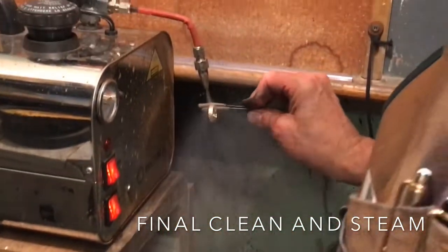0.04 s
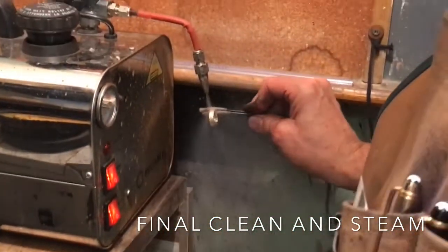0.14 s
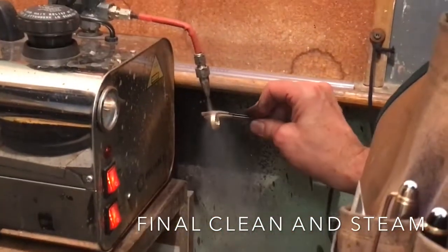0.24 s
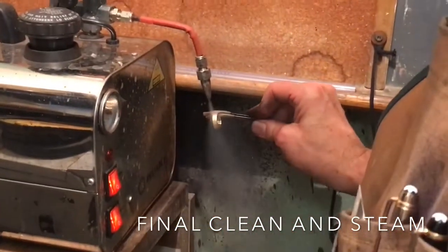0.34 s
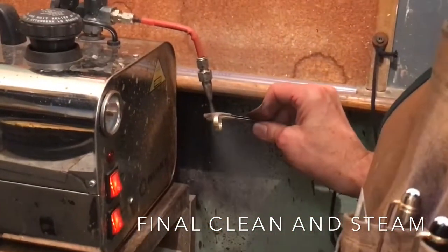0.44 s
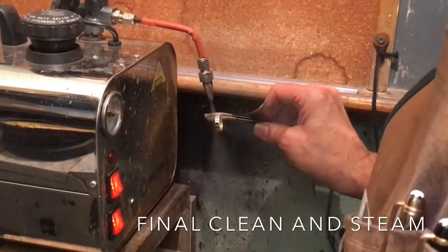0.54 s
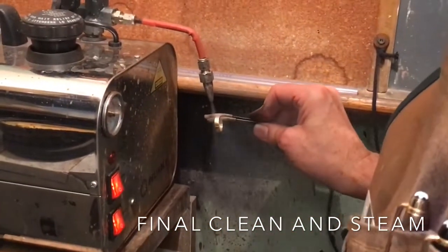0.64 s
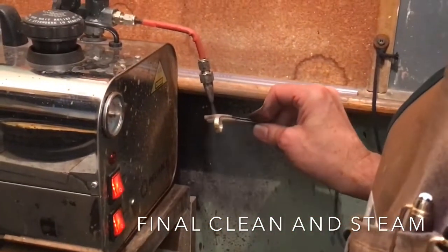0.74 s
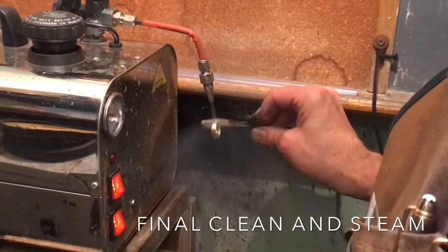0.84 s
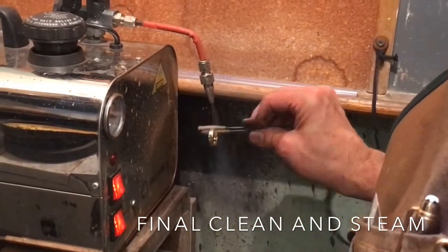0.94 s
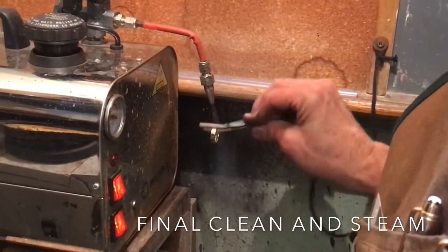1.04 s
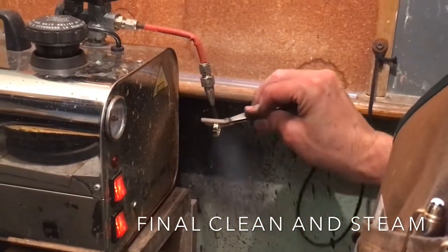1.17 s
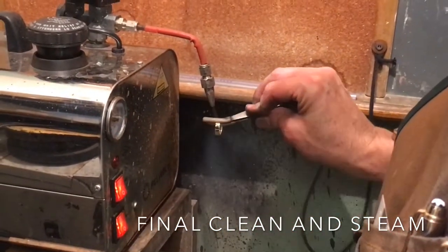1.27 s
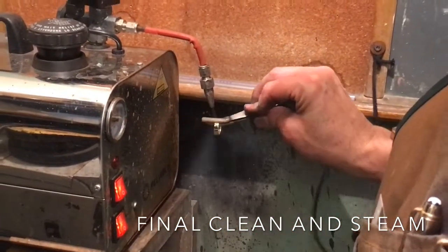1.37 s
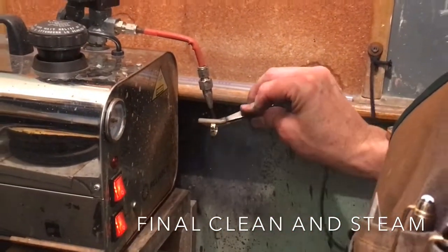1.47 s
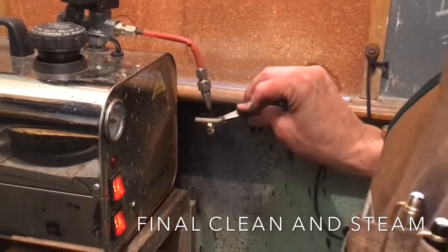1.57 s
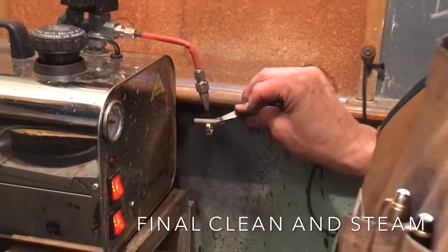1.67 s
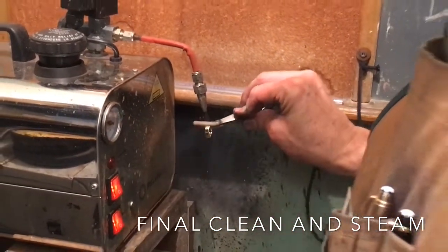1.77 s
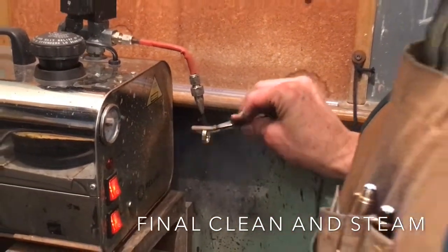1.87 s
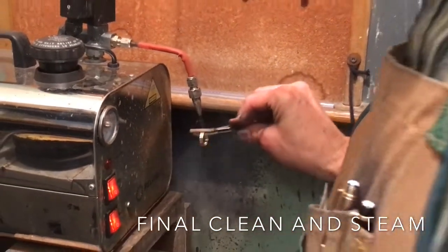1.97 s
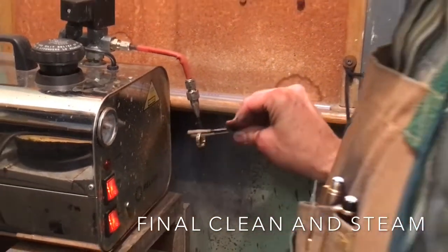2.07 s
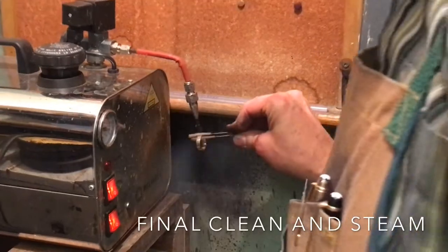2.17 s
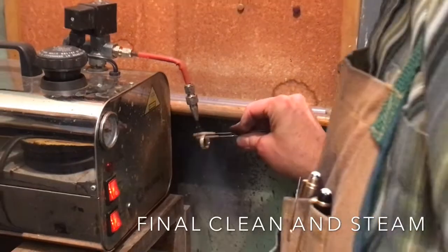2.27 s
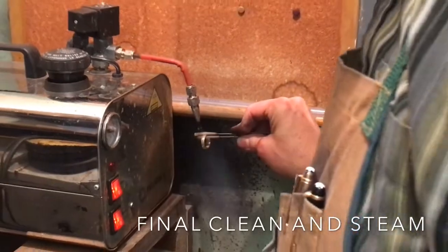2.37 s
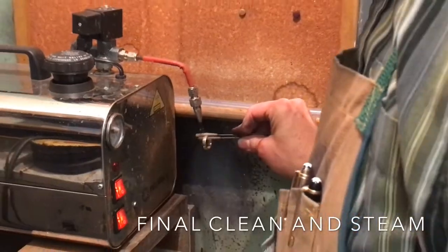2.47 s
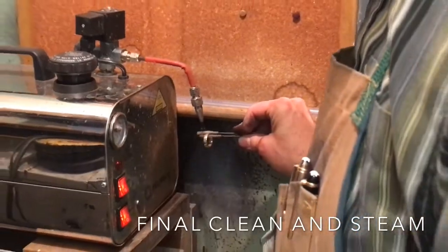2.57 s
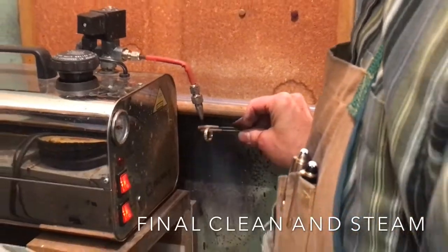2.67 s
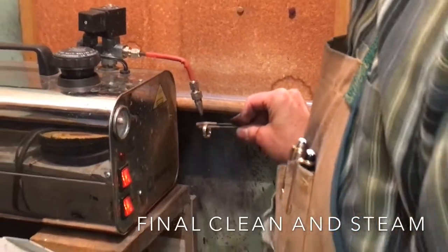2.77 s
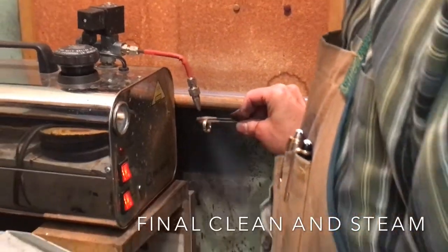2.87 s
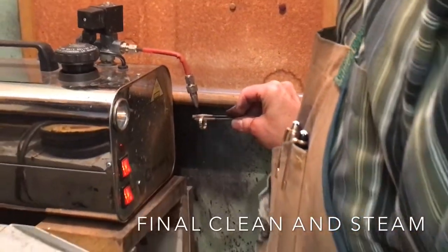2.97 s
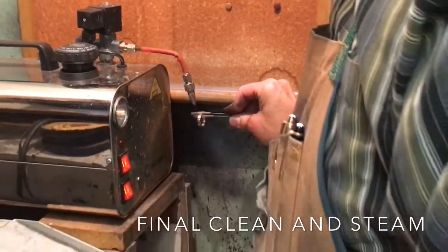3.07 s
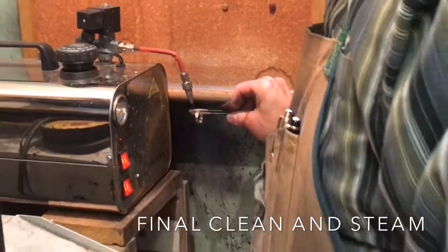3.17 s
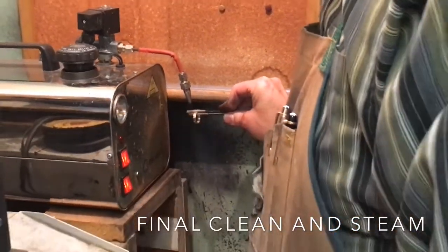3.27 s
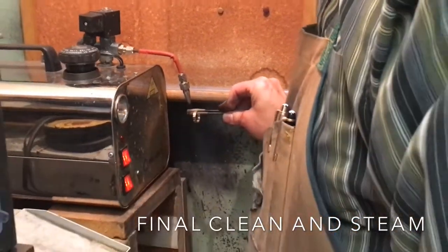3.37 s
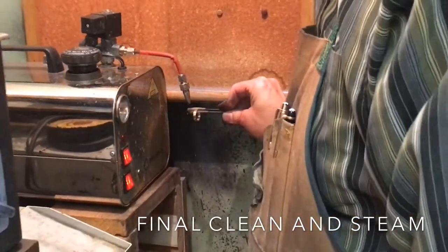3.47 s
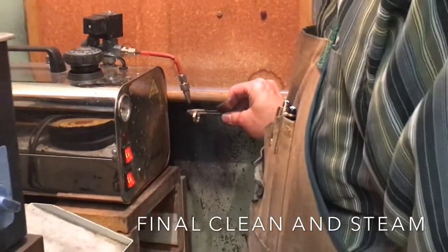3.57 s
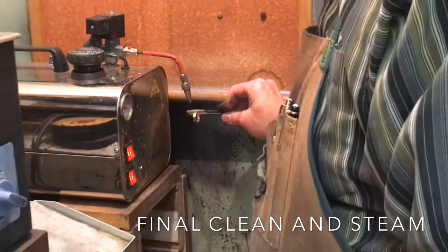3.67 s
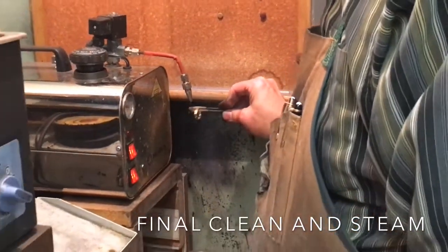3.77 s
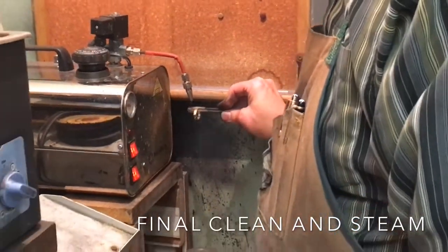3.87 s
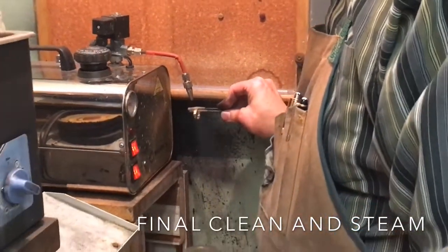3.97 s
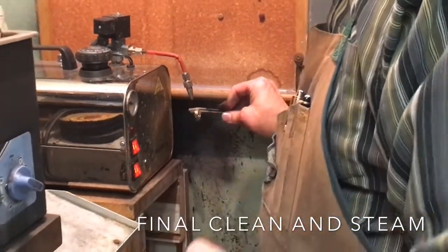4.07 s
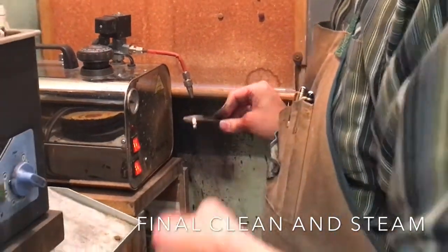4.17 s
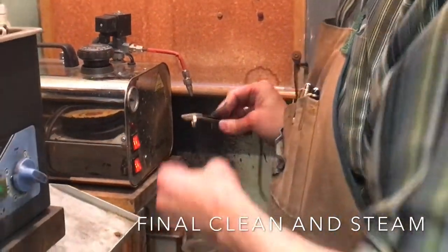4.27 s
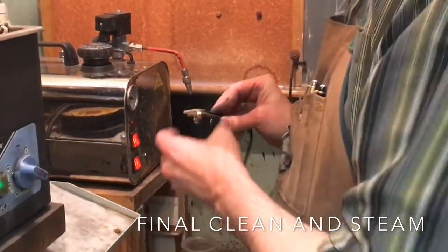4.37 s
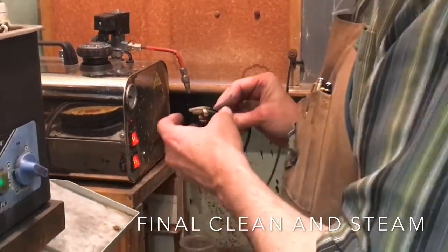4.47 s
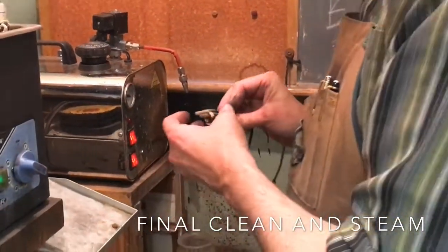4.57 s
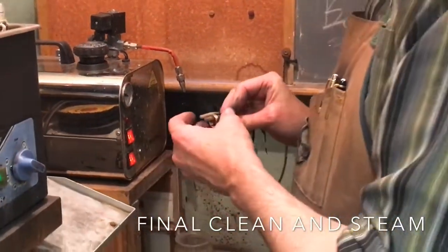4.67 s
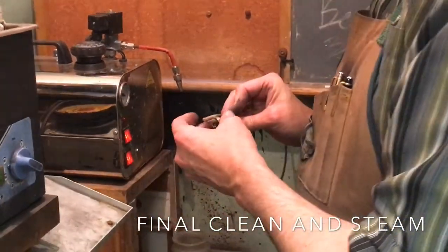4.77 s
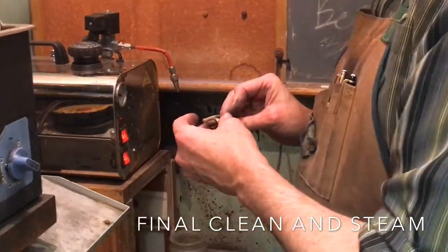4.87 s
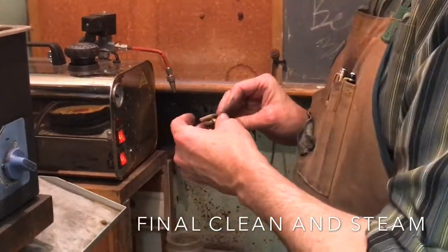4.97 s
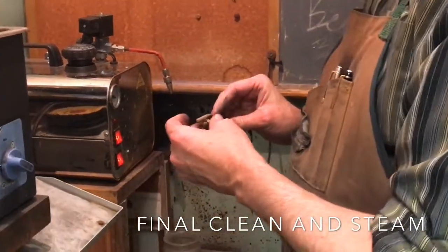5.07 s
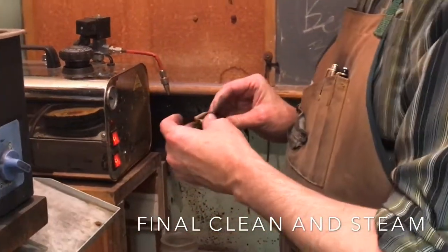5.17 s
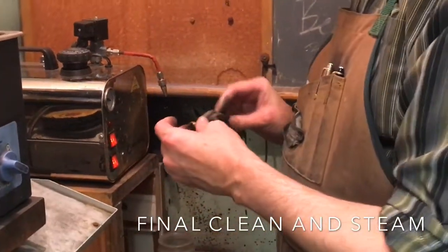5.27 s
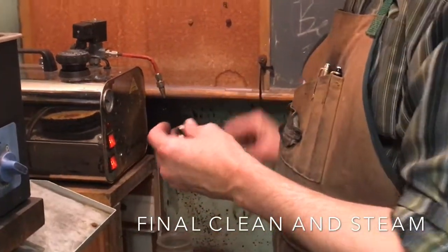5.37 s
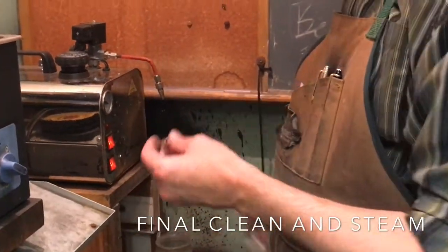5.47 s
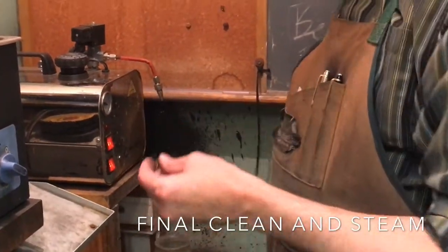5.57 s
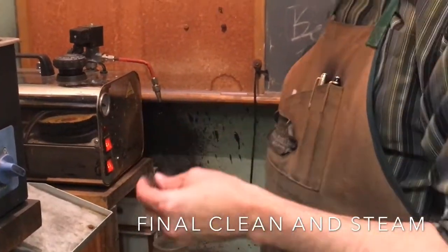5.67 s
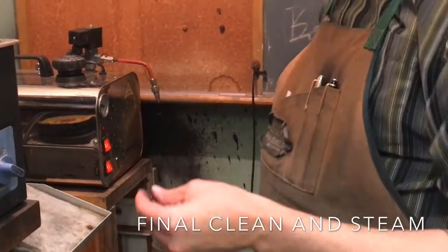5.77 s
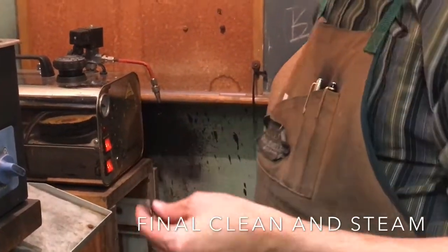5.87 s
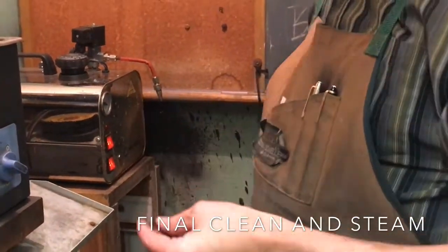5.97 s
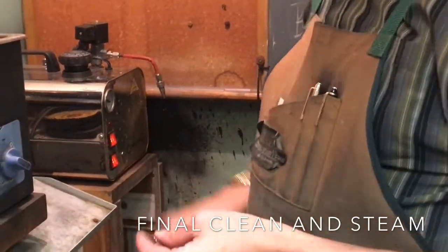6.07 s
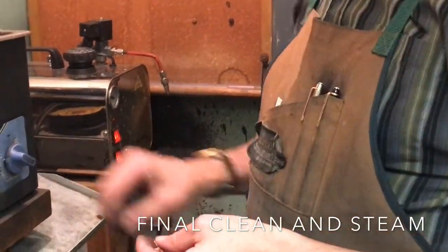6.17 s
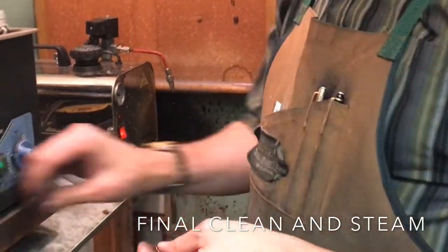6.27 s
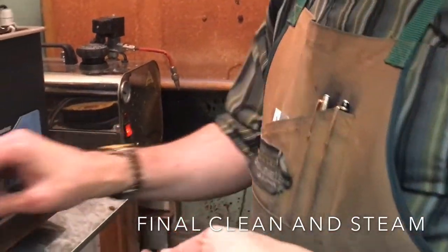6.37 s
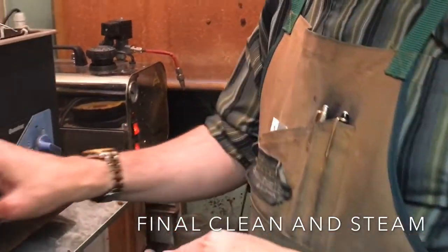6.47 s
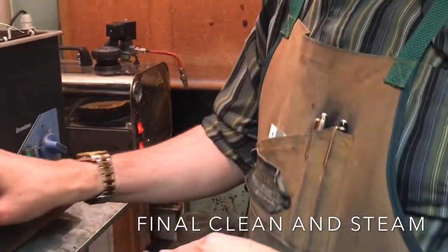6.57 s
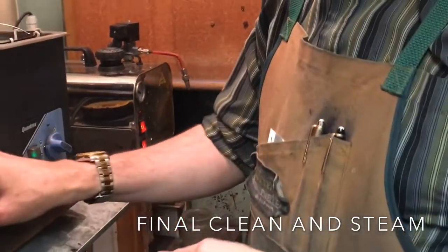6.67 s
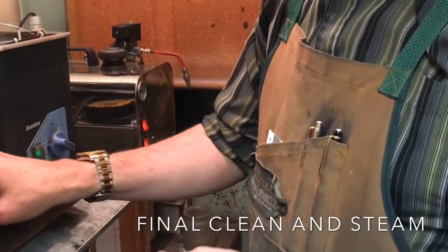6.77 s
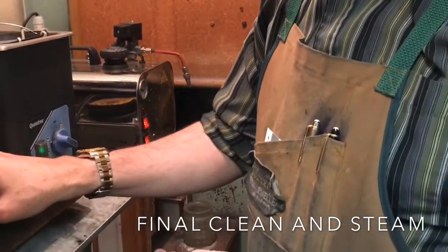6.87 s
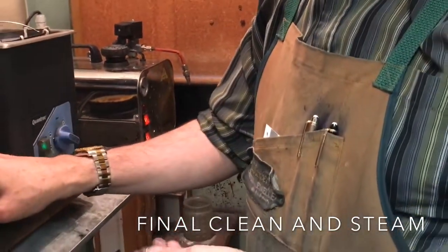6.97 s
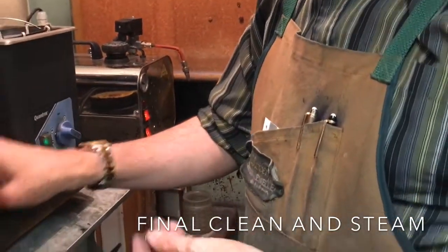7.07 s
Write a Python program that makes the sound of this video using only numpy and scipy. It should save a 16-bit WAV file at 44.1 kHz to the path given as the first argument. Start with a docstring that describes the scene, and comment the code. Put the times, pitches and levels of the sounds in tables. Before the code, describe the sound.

High-pressure steam blasts a small metal piece for four seconds, then snaps shut, leaving faint workshop hum, ultrasonic bath sizzle and slight handling sounds.

```python
"""Steam cleaner on jewellery

A steam jet blasts a small piece held in tweezers, close to a mono microphone in a workshop: coloured noise
whose level and colour change as the piece turns. A pedal creaks (slips ringing resonances) and the valve shuts.
Gain control lets the room come up: noise surging at the mains rate for an ultrasonic bath, rumble for a fan,
and low hum tones. Noise swells are fingers rubbing; damped sine pulses are bumps on the bench."""
import sys
import numpy as np
from scipy import signal
from scipy.fft import rfft, irfft, next_fast_len
from scipy.io import wavfile
from scipy.ndimage import uniform_filter1d, minimum_filter1d, map_coordinates

SR = 44100
rng = np.random.default_rng(int(sys.argv[2]) if len(sys.argv) > 2 else 0)


def materialize(psi):
    """Save the field psi as 16-bit PCM at rate SR to the path in sys.argv[1].

    A 1-D psi becomes a single channel; in a 2-D psi each row is a channel.
    """
    bounded = np.clip(np.atleast_2d(psi).T, -1, 1)
    quanta = np.round(bounded * 32767).astype(np.int16)
    wavfile.write(sys.argv[1], SR, quanta)


N = 313992  # length in samples


def amp(db):
    """Decibels to gain."""
    return 10 ** (np.asarray(db) / 20)


def unit(x):
    """x at rms 1."""
    return x / np.sqrt(np.mean(x ** 2) + 1e-20)


def clock():
    """Time of each sample in seconds."""
    return np.arange(N) / SR


def curve(rows):
    """Breakpoints (s, value) interpolated to one value per sample."""
    s, values = np.transpose(rows)
    return np.interp(clock(), s, values)


def wobble(rate_hz):
    """Smooth random curve through rate_hz knots a second."""
    knots = rng.standard_normal(int(N * rate_hz / SR) + 4)
    return map_coordinates(knots, [np.arange(N) * rate_hz / SR])


def filtered(x, response):
    """x times a complex response of frequency."""
    size = next_fast_len(N + SR // 2)
    spectrum = rfft(x, size) * response(np.fft.rfftfreq(size, 1 / SR))
    return irfft(spectrum, size)[..., :N]


def noise(colour):
    """Noise of rms 1 coloured by (Hz, dB per Hz) points, joined on a log frequency axis."""
    f, db = np.transpose(colour)
    return unit(filtered(rng.standard_normal(N), lambda hz: amp(np.interp(np.log(hz + 1), np.log(f), db))))


def patchy(x, depth_db, bins, frames):
    """Narrow bands of x swell and fade independently; rms 1."""
    z = signal.stft(x, nperseg=1024)[2]
    field = rng.standard_normal(z.shape)
    field = uniform_filter1d(field, int(bins), 0)
    field = uniform_filter1d(field, int(frames), 1)
    return unit(signal.istft(z * amp(depth_db * unit(field)))[1][:N])


def steam():
    """Turbulent hiss and top sizzle at the nozzle and piece, over the plume's lower rush."""
    # Spectra, each row: frequency in Hz, relative level in dB per Hz.
    hiss_colour = [(1500, -35.5), (3100, -15.5), (4900, -6.5), (5700, 0), (6800, 1), (8400, 0.5),
                   (11400, -4.5), (13200, -2.5), (15600, -1.5)]
    plume_colour = [(210, -45), (400, -13), (620, -9), (1050, -6), (1500, -5), (2200, 0), (3300, 0),
                    (4500, 0), (7000, -22.5)]
    # Level curves ahead of the layer gains; the first is how squarely the piece sits in the jet.
    # Each row: time in seconds, level in dB.
    aim = [(0.0, -16.5), (0.618, -15.0), (0.881, -20), (1.122, -18.5), (1.157, -17), (1.514, -19.5),
           (1.591, -25), (1.721, -24), (1.968, -17.5), (2.239, -17.3), (2.832, -21.0), (2.964, -17),
           (3.125, -18), (4.05, -20)]
    sizzle_level = [(0.001, -24.6), (0.175, -19), (0.307, -28), (0.529, -19), (0.611, -27), (0.807, -22.5),
                    (1.092, -31), (1.158, -26.3), (1.514, -24.5), (1.588, -30.5), (2.02, -23.5),
                    (2.485, -22.5), (2.87, -24.8), (2.91, -20.5), (3.427, -25.5), (4.051, -28)]
    plume_level = [(0.0, -26), (0.564, -27), (0.949, -30), (1.16, -28.7), (1.689, -33.5), (1.998, -29),
                   (2.493, -30), (2.812, -32.3), (2.943, -27.6), (3.375, -33), (4.05, -32.5)]
    hiss_gain_db, sizzle_gain_db, plume_gain_db = 6, 11.5, 5.5
    sizzle_flare_share, plume_flare_share = 0.43, 0.54
    sizzle_power, plume_power = 1.3, 0.96  # as flow falls, sizzle dies first, plume last

    flare_db, flow = flares(), valve()
    full_hiss = patchy(noise(hiss_colour), depth_db=2.5, bins=4, frames=24)
    # smooth high-pass step at 12.5 kHz
    sizzle = filtered(full_hiss, lambda hz: 1 / (1 + np.exp(np.clip((12500 - hz) / 300, -50, 50))))
    hiss = unit(full_hiss - sizzle)
    plume = patchy(noise(plume_colour), depth_db=2.5, bins=3, frames=22)

    hiss_db = hiss_gain_db + curve(aim) + flare_db
    sizzle_db = sizzle_gain_db + curve(sizzle_level) + sizzle_flare_share * flare_db
    plume_db = plume_gain_db + curve(plume_level) + plume_flare_share * flare_db
    blast = amp(hiss_db) * flow * hiss
    blast += amp(sizzle_db) * flow ** sizzle_power * unit(sizzle)
    blast += amp(plume_db) * flow ** plume_power * plume
    sputter_db = 0.27 * wobble(70) + 0.43 * wobble(21.88)  # wet steam flows unevenly
    return corner(amp(sputter_db) * blast, echo_db=-9.5, spread_s=.014)


def flares():
    """A quick turn of the piece catches the jet: level in dB rises, holds and falls back."""
    # Each row: start in seconds, hold in seconds, rise in dB.
    flare_rows = [(0.922, 0.05, 4), (1.273, 0.0052, 3), (1.38, 0.042, 2.5), (1.793, 0.025, 1.5),
                  (3.184, 0.065, 3), (3.29, 0.055, 4.5), (3.565, 0.04, 5), (3.718, 0.026, 4.5),
                  (3.845, 0.0, 4.5), (3.921, 0.039, 2)]
    attack_s, release_s = 0.029, 0.033
    total_db = np.zeros(N)
    for start_s, hold_s, rise_db in flare_rows:
        corners_s = start_s + np.cumsum([0, attack_s, hold_s, release_s])
        total_db += rise_db * np.interp(clock(), corners_s, [0, 1, 1, 0])
    return total_db


def valve():
    """Flow, 0-1: full until the valve closes, then the pipe drains in a dying trickle."""
    shut_s, closing_s = 4.18, 0.086  # fully shut at shut_s
    seat_power = 1.5  # flow tapers off near the seat
    drain_db, drain_db_per_s = -25.5, 130
    opening = np.clip((shut_s - clock()) / closing_s, 0, 1)
    trickle = amp(drain_db - drain_db_per_s * np.maximum(clock() - shut_s, 0))
    return np.maximum(opening ** seat_power, trickle)


def corner(x, echo_db, spread_s, count=14):
    """Nearby hard surfaces colour the sound and comb it with short echoes."""
    # Peaks and hollows between boiler and wall.
    # Each row: centre in Hz, Gaussian width in Hz, gain in dB.
    colouring = [(1082, 91, 5.5), (2170, 92, 2.5), (2500, 27, 1), (2890, 180, -3), (3240, 180, 3),
                 (5100, 140, -0.9), (6300, 60, 1.5), (6930, 180, 0.5), (7630, 270, -2), (9440, 750, 1.5),
                 (10400, 226, -3), (11390, 620, 4)]
    delays_s = rng.uniform(.001, spread_s, count)
    signs = rng.choice([-1, 1], count)
    taps = np.bincount((delays_s * SR).astype(int), signs) * amp(echo_db) / np.sqrt(count)
    taps[0] = 1  # direct sound
    echoed = signal.fftconvolve(x, taps / np.linalg.norm(taps))[:N]

    def response(hz):
        return amp(sum(db * np.exp(-.5 * ((hz - f) / width) ** 2) for f, width, db in colouring))

    return filtered(echoed, response)


def spill():
    """Steam that misses the piece roars on the bench, dying as the piece moves into the jet."""
    # Each row: frequency in Hz, relative level in dB per Hz.
    roar_colour = [(15, -14.5), (40, 4.5), (150, -6.5), (400, -5), (700, -4), (1300, -12), (4000, -50)]
    start_db, sag_db_per_s = -32.5, 11
    fade_start_s, fade_db_per_s = 0.84, 60  # fade adds to the sag
    level_db = start_db - sag_db_per_s * clock()
    level_db -= fade_db_per_s * np.maximum(clock() - fade_start_s, 0)
    return amp(level_db + 1.6 * wobble(14)) * noise(roar_colour)


def pedal():
    """Stick and slip as the pedal is let go: slowing, weakening slips ring its resonances."""
    # Each row: resonance in Hz, width in Hz, gain in dB.
    resonances = [(160, 48, -6), (240, 23, 1.5), (374, 43, -5.5), (557, 17, 3.5), (749, 51, -14),
                  (1044, 40, -14), (1860, 51, -3)]
    start_s, length_s = 3.989, .045
    first_hz, last_hz = 249.2, 170.3  # slip rate ahead of the random unevenness
    slip_db, fade_db = 18.2, 4
    travel = np.clip((clock() - start_s) / length_s, 0, 1)
    moving = (travel > 0) * (travel < 1)
    rate_hz = (first_hz + (last_hz - first_hz) * travel) * moving
    uneven = np.exp(.3 * wobble(250))
    slips = np.diff(np.ceil(np.cumsum(rate_hz * uneven) / SR), prepend=0)  # an impulse per whole cycle
    level_db = slip_db - fade_db * travel + 1.9 * wobble(200)

    def body(f):
        return sum(amp(db) * 1j * f * w / (c * c - f * f + 1j * f * w) for c, w, db in resonances)

    return filtered(slips * amp(level_db), body)


def fingers():
    """Fingers rub the piece and tweezers: soft swells of scratchy, grainy noise."""
    # Each row: centre in seconds, Gaussian width in seconds, centre frequency in Hz, level in dB.
    rubs = [(5.052, 0.036, 4000, -47), (5.737, .012, 4800, -45.5)]
    total = np.zeros(N)
    for centre_s, width_s, hz, db in rubs:
        swell = np.exp(-.5 * ((clock() - centre_s) / width_s) ** 2)
        grain = unit(amp(2.5 * wobble(400)))
        scratch = noise([(hz / 3, -30), (hz * 0.83, -2), (hz * 1.2, 0), (hz * 3, -25)])
        total += amp(db) * swell * grain * scratch
    return total


def bumps():
    """Soft bumps against the bench: a dull push of about one cycle, with no ring."""
    # Each row: centre in seconds, pitch in Hz, level in dB of the sine ahead of its envelope.
    bump_rows = [(.592, 130, -23), (5.897, 188.7, -26)]
    total = np.zeros(N)
    for centre_s, hz, db in bump_rows:
        cycles = (clock() - centre_s) * hz
        total += amp(db) * np.sin(2 * np.pi * cycles) * np.exp(-2 * cycles ** 2)
    return total


def bath():
    """Ultrasonic bath: cavitation fizz surges once per mains cycle, with random level changes."""
    # Each row: frequency in Hz, relative level in dB per Hz.
    fizz_colour = [(1650, -24), (2800, -16.5), (4510, -12), (4910, -12.5), (6460, -4.5), (7520, -4.5),
                   (9750, -3.5), (10400, -4.5), (11300, -3), (13700, -4), (15700, -5.5)]
    mains_hz = 60
    phase = 2 * np.pi * mains_hz * clock() - 1.9
    surge_power = np.maximum(1 + 0.5 * np.cos(phase) + .17 * np.cos(2 * phase + 1.8), 0)
    fizz = patchy(noise(fizz_colour), depth_db=1.55, bins=5.6, frames=16)
    fizz *= np.sqrt(surge_power) * amp(0.8 * wobble(70))
    return corner(amp(-38.5) * fizz, echo_db=-10.0, spread_s=0.013)


def fan():
    """Lumpy rumble of moving air with one slow bass surge, and wavering low hum tones."""
    # Air spectrum, each row: frequency in Hz, relative level in dB per Hz.
    air_colour = [(15, -41), (25, -23), (59, 3), (96, -5.5), (129, -5.5), (209, -7.5), (352, -8.5),
                  (447, -19.5), (592, -14.5), (738, -14), (800, -23.5), (884, -10.5), (1490, -19.5),
                  (2050, -19.5), (3000, -31), (3900, -62), (6600, -120)]
    # Two tones at mains multiples and a room tone at 237 Hz.
    # Each row: frequency in Hz, mid level in dB.
    hum_tones = [(60, -48), (120, -49), (237, -49.5)]
    surge_s, surge_width_s, surge_rise_db = 5.15, 0.057, 4
    air = amp(-39.0) * patchy(noise(air_colour), depth_db=2.5, bins=2, frames=9)
    rumble = filtered(air, lambda hz: 1 / (1 + (hz / 420) ** 8))
    surge_db = surge_rise_db * np.exp(-.5 * ((clock() - surge_s) / surge_width_s) ** 2)
    bass_gain = amp(surge_db + 0.3 + 1.1 * wobble(14))
    hum = np.zeros(N)
    for hz, db in hum_tones:
        level = amp(db + 2.5 * wobble(4.4))
        hum += level * np.sin(2 * np.pi * hz * clock() + .5 * wobble(5.4))
    return air + (bass_gain - 1) * rumble + hum


def scene():
    """One microphone feeds both channels."""
    mono = steam() + spill() + pedal() + fingers() + bumps() + bath() + fan()
    return np.array([mono, mono])


def gain_control(x, threshold_db, most_db, release_s):
    """Loud sound turns the gain down, by most_db at most; it comes back after a short hold."""
    power = uniform_filter1d(x[0] ** 2, SR // 50)  # 20 ms mean
    level_db = 10 * np.log10(np.abs(power) + 1e-12)
    needed_db = -np.clip(level_db - threshold_db, 0, most_db)
    span = int(release_s * SR) | 1  # odd; both windows look back
    held_db = minimum_filter1d(needed_db, span, origin=span // 2)
    return x * amp(uniform_filter1d(held_db, span, origin=span // 2))


def record(dry):
    """Gain control, then a sharp band limit."""
    top_hz = 15750
    levelled = gain_control(dry, threshold_db=-19.0, most_db=6.5, release_s=0.095)
    return filtered(levelled, lambda hz: hz < top_hz)


dry = scene()
out = record(dry)
materialize(out)
```